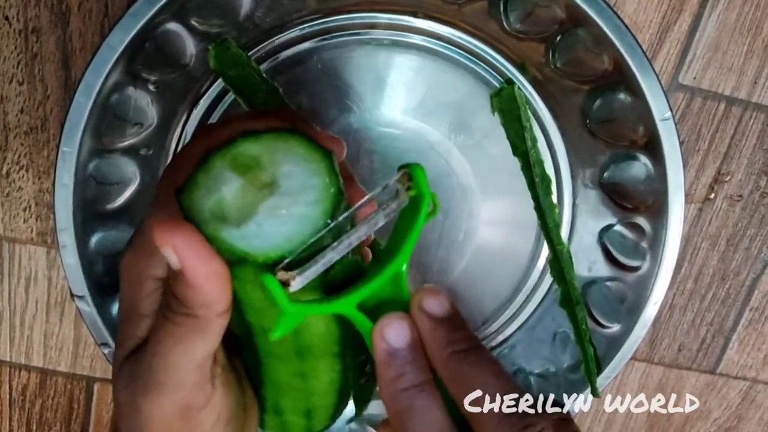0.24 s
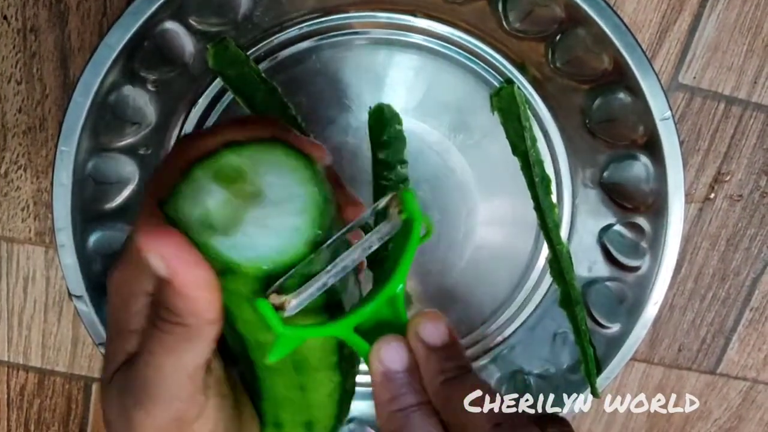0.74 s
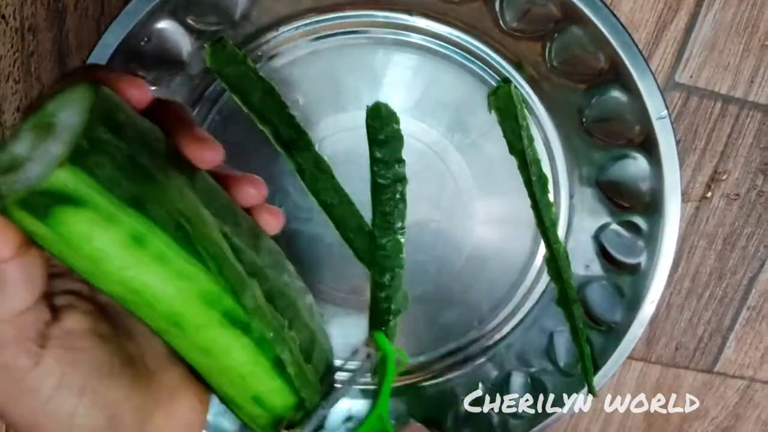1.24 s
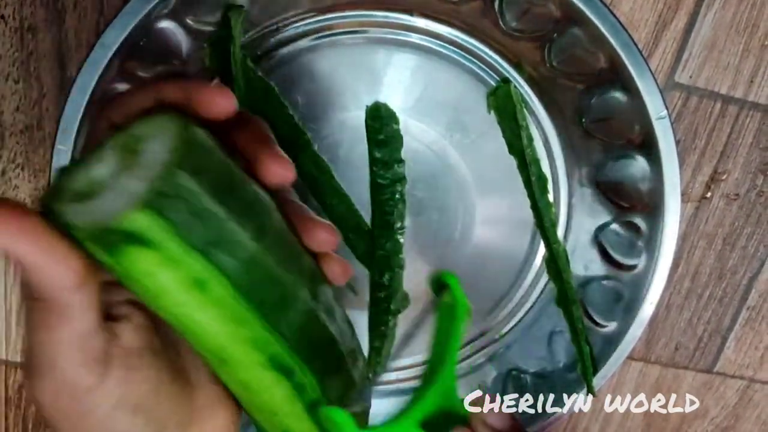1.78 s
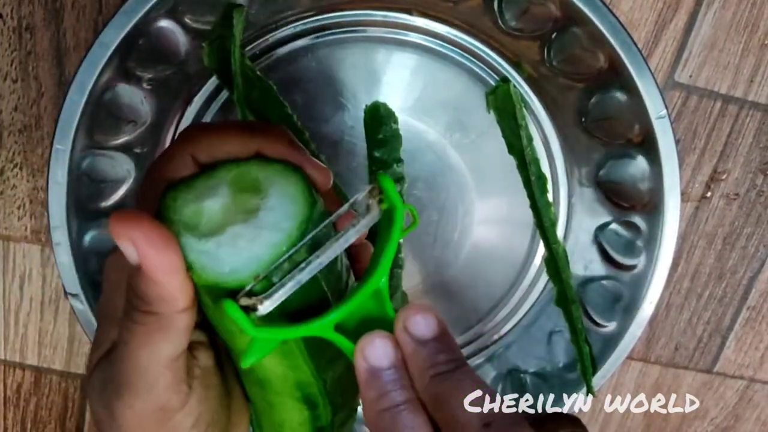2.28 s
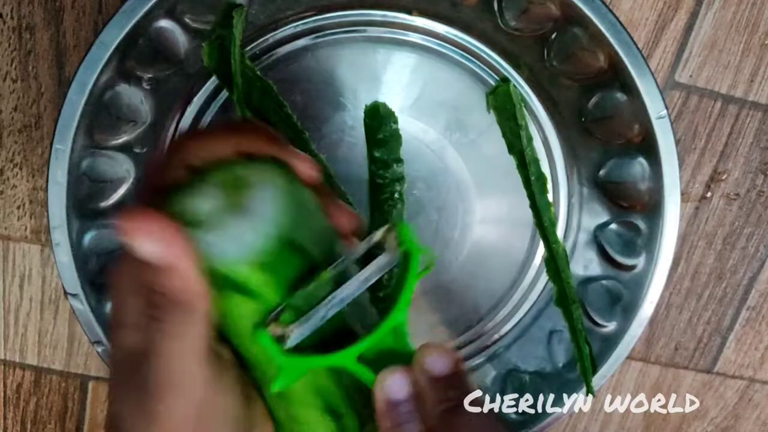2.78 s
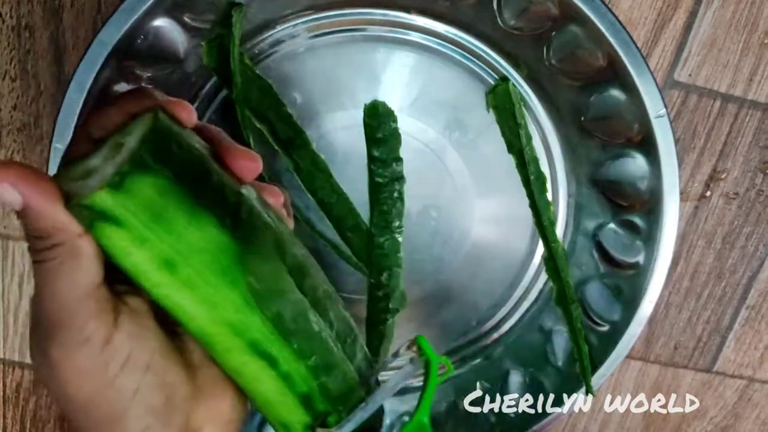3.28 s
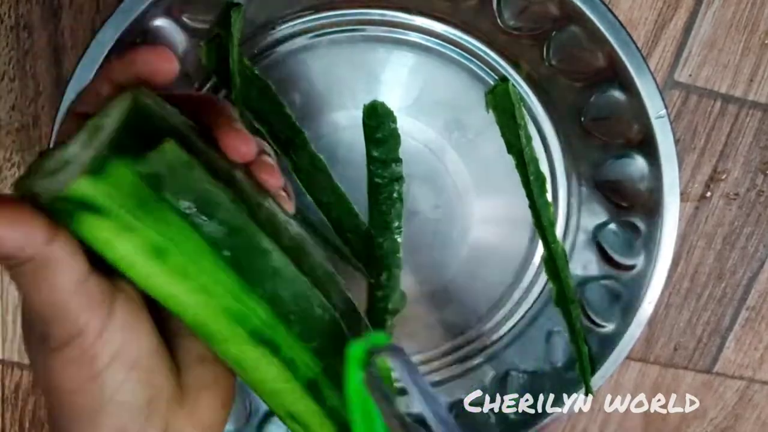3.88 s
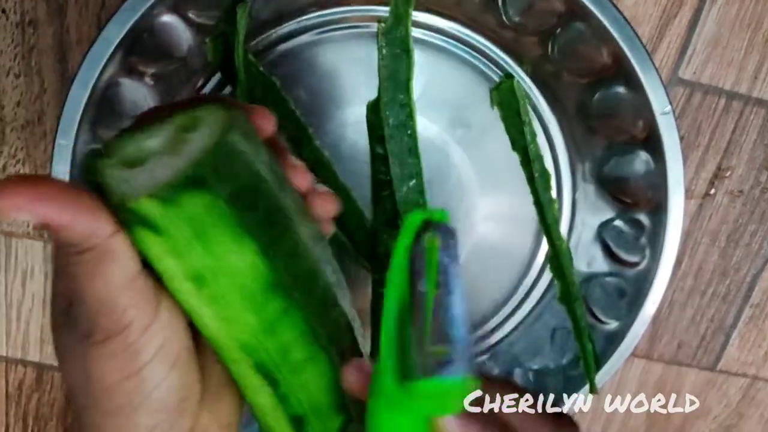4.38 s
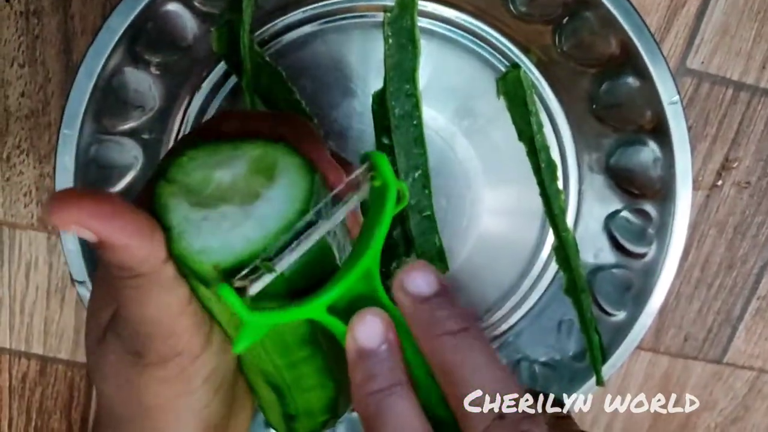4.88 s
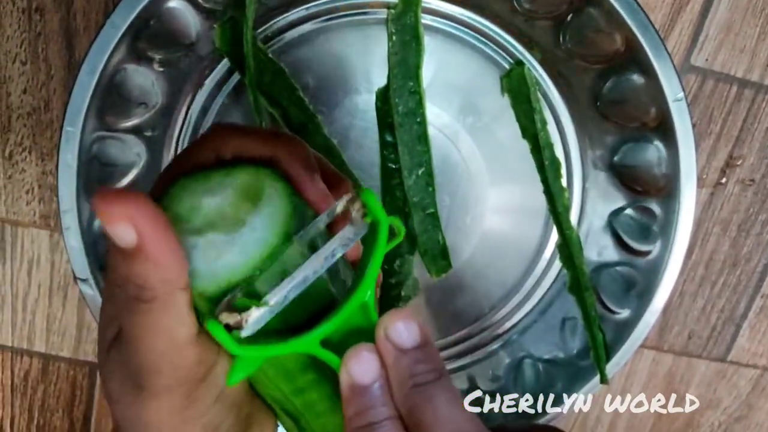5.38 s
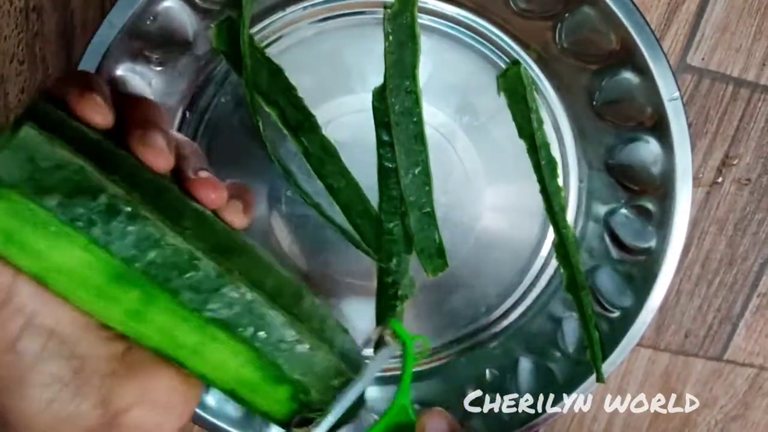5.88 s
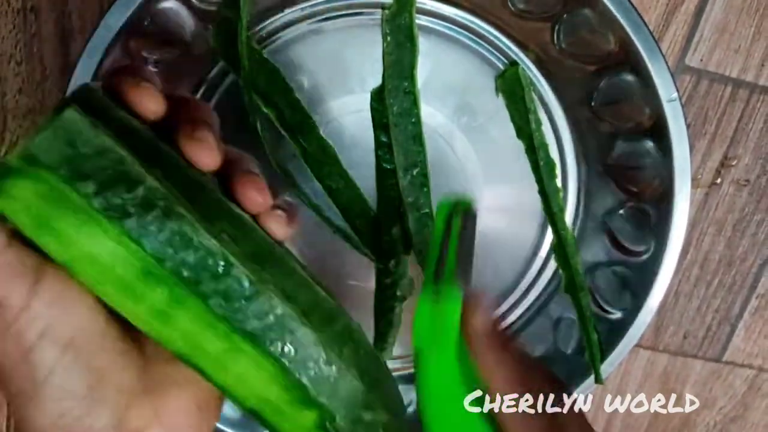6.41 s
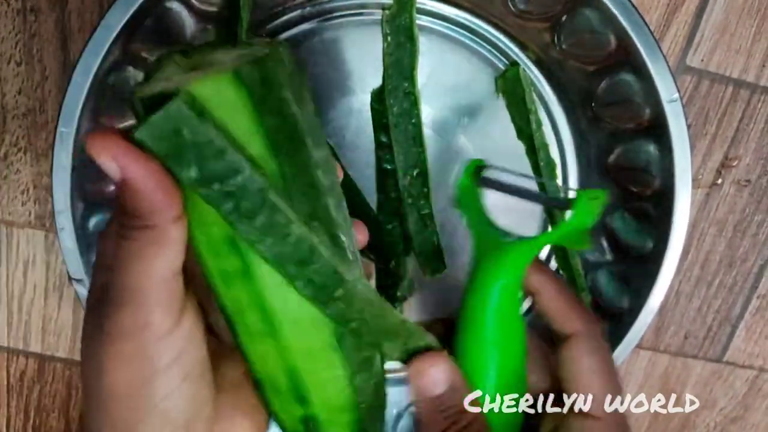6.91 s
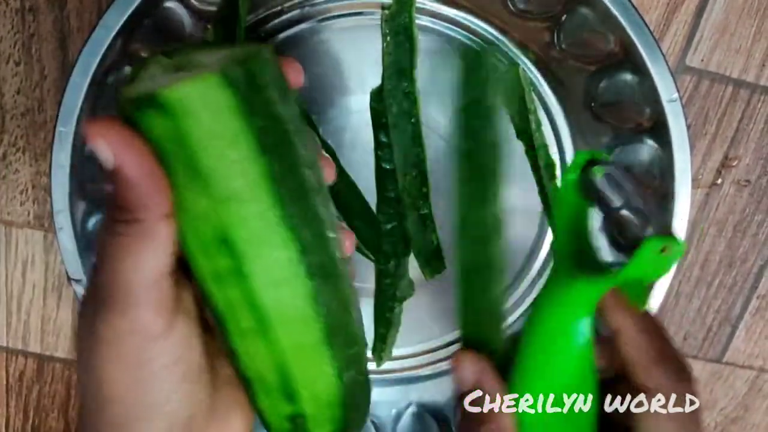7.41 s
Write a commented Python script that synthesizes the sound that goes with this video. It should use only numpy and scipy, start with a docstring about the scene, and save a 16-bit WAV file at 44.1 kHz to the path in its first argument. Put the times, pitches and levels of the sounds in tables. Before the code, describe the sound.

Close, wet, crunchy peeling strokes with snapping fibres and tiny squeaks, a hard clack near the start and another at the end, over soft room air.

```python
"""Peeling a cucumber in a small kitchen

A swivel peeler takes three strips off a cucumber over a steel plate, each in three short pulls.
Noise bursts for rupturing cells make the crunch; fibres snap as short noise, wet flesh squeaks as wavering tones.
Twice there is a sharp clack, and the loose blade ticks between pulls: noise cracks with decaying modes.
A small hard kitchen answers over a steady low rush of air and an early faint hum.
Two microphone ports listen from close above."""
import sys
import numpy as np
from scipy import signal
from scipy.fft import rfft, irfft, next_fast_len
from scipy.io import wavfile
from scipy.ndimage import uniform_filter1d, map_coordinates

SR = 44100
rng = np.random.default_rng(int(sys.argv[2]) if len(sys.argv) > 2 else 0)


def output_pcm(signal):
    """Save a mono or channel-first signal as 16-bit PCM at the path in sys.argv[1].

    Samples are clipped to [-1, 1] before scaling.
    """
    pcm = np.clip(np.atleast_2d(signal).T, -1, 1) * 32767
    wavfile.write(sys.argv[1], SR, np.round(pcm).astype(np.int16))


N = 337365

# spectrum of tearing skin: frequency_hz, density_db (relative, per Hz)
SKIN_SPECTRUM = [(500, -23), (900, -2), (1450, -5.5), (1850, -3.5), (2150, -1), (2800, -11.5), (3400, -11),
                 (4900, -17), (5700, -8), (6700, -1.5), (7400, 0), (8250, -4), (9200, -2.5), (10000, -18.5),
                 (11000, -26.5), (15500, -27)]
# modes of the peeler's frame, damped by the hand: frequency_hz, level_db, t60_s
FRAME_MODES = [(713, -10.5, 0.075), (1137, -4, 0.06), (1330, -14, 0.077), (1960, 12.5, 0.018),
               (2940, -14, 0.07), (3316, 0, 0.051), (3940, -3, 0.04), (4820, -7, 0.045), (5600, -10, .055),
               (6400, -10, 0.055), (6950, -8, 0.04), (7450, -7, 0.055), (8200, -9, .05), (9006, -6, 0.04)]


def amp(db):
    """Amplitude factor of a level in dB."""
    return 10 ** (np.asarray(db) / 20)


def unit(x):
    """x scaled to an rms of one."""
    return x / np.sqrt(np.mean(x ** 2) + 1e-20)


def along(points, hz):
    """Values between (Hz, value) points, on a log frequency axis."""
    f, v = np.transpose(points)
    return np.interp(np.log(hz + 1), np.log(f + 1), v)


def wobble(rate):
    """A smooth random curve through rate knots a second."""
    knots = rng.standard_normal(int(N * rate / SR) + 4)
    return map_coordinates(knots, [np.arange(N) * rate / SR])


def swells(rows):
    """Gain per sample from bells: centre s, time from centre to 1/e s, peak dB."""
    t = np.arange(N) / SR
    return sum(amp(db) * np.exp(-((t - s) / half) ** 2) for s, half, db in rows)


def filtered(x, response):
    """x times a response of frequency, padded so that tails do not wrap."""
    n = x.shape[-1]
    m = next_fast_len(n + SR // 4)
    return irfft(rfft(x, m) * response(np.fft.rfftfreq(m, 1 / SR)), m)[..., :n]


def coloured(x, points, size=2048):
    """x through a causal, minimum-phase filter with the given (Hz, dB) shape."""
    shape = amp(along(points, np.fft.rfftfreq(size, 1 / SR)))
    cepstrum = irfft(np.log(shape))
    # folding the cepstrum onto positive time puts the energy as early as it can be
    cepstrum[1:size // 2] *= 2
    cepstrum[size // 2 + 1:] = 0
    impulse = irfft(np.exp(rfft(cepstrum)))
    return signal.fftconvolve(x, impulse)[:len(x)]


def add(track, s, sound):
    """Mix a sound into the track at time s."""
    part = track[round(s * SR):][:len(sound)]
    part += sound[:len(part)]


def lagged(x):
    """Sound reaches the left port a little after the right, half the lag taken on each."""
    lag_s = 0.00017
    return filtered(x, lambda hz: np.exp(-1j * np.pi * np.outer([1, -1], hz) * lag_s))


def air():
    """A steady low rush in the room, most alike at the two ports in the bass."""
    # spectrum of the room air: frequency_hz, density_db (relative, per Hz)
    air_spectrum = [(15, -37), (25, -5), (37, -15), (82, -11.5), (140, -11.5), (156, -7), (178, -2),
                    (209, -4), (305, -2.5), (349, -11.5), (389, -1.5), (421, -4.5), (509, -1.5),
                    (567, -4.5), (741, -3), (919, -10), (1140, -8.5), (1410, -12), (2400, -17), (3930, -27),
                    (7500, -26.5), (9300, -29), (10600, -57), (15500, -57)]
    # room resonances that colour the air: frequency_hz, width_hz, boost_db
    resonances = [(177.1, 7.9, 6.5), (603, 43, 3), (1185, 120, 3.5)]
    # likeness of the two ports: frequency_hz, correlation (0 to 1)
    likeness = [(60, 0.39), (150, 1), (380, 0.78), (950, 0.48), (2380, 0.22), (5980, 0.047), (15000, 0.078)]
    # balance of the two ports: frequency_hz, left_minus_right_db
    balance = [(60, 6), (150, 4.5), (380, 5), (950, 2), (2380, 3), (5980, -0.5), (15000, 5)]
    level_db = -45.5  # of the mid signal, before the balance

    def mid_side_colour(hz):
        bumps = sum(db / (1 + (2 * (hz - centre) / width) ** 2) for centre, width, db in resonances)
        angle = np.arccos(np.clip(along(likeness, hz), -1, 1)) / 2
        side_share = np.tan(angle)
        return amp(along(air_spectrum, hz) + bumps) * np.array([np.ones_like(hz), side_share])

    mid, side = filtered(rng.standard_normal((2, N)), mid_side_colour)
    pair = np.array([mid + side, mid - side]) / np.std(mid)
    pair = filtered(pair, lambda hz: amp(np.outer([.5, -.5], along(balance, hz))))
    return pair * amp(level_db + 0.05 * wobble(2.3) + 0.2 * wobble(9.9))


def hum():
    """A faint low tone of unsteady level, the same at both ports, that stops early on."""
    pitch_hz, stop_s = 57.4, 2.3
    t = np.arange(N) / SR
    level = amp(-63 + 3.2 * wobble(4.1))
    stopping = np.clip((stop_s - t) * 20, 0, 1)
    return level * np.sin(2 * np.pi * pitch_hz * t) * stopping


def crack(t, t60):
    """A hard contact: a dying noise burst, evened over the spectrum and then coloured."""
    # spectrum of a hard contact: frequency_hz, density_db (relative, per Hz)
    contact_spectrum = [(50, -41), (200, -3.5), (450, -20), (880, -14.5), (1150, 3), (1600, -6), (2000, 1),
                        (2650, -3), (4500, -2.5), (6200, -3), (7600, 3), (9200, 4), (10300, -14.5),
                        (12500, -21), (15500, -24)]
    fade = amp(-60 * t / t60)
    phases = np.angle(rfft(rng.standard_normal(len(t)) * fade))
    even = irfft(np.exp(1j * phases), len(t))
    burst = coloured(even * np.sqrt(fade), contact_spectrum)
    return burst * np.linalg.norm(fade) / np.linalg.norm(burst)


def ring(t, modes, scatter_db):
    """A struck part's modes as decaying sines, their strengths scattered anew for each blow."""
    rise_s = 0.0003  # the modes take an instant to build up
    hz, db, t60 = np.transpose(modes)[:, :, None]
    gain = amp(db + scatter_db * rng.standard_normal(hz.shape) - 60 * t / t60)
    return np.sum(gain * np.sin(2 * np.pi * hz * t), 0) * (1 - np.exp(-t / rise_s))


def chirp(t, hz, swell):
    """The thin blade buzzes for an instant in its pivot: a tone that peaks after swell seconds."""
    envelope = t / swell * np.exp(1 - t / swell)
    return envelope * np.sin(2 * np.pi * hz * t)


def ticks():
    """Light contacts: bright when the blade alone moves, fuller and ringing when the frame is knocked."""
    # light ticks of the loose blade: start_s, level_db (before trim), body_db, ring_db, sharpness_db
    tick_rows = [(0.4265, -42.5, 27, -26, -4), (1.569, -38, 10, -15, -5), (1.621, -47, 23, -28, -8),
                 (1.647, -43, 26, -28, -15), (1.873, -38.5, -22, -22, -8), (2.241, -41, 13, -19, -17),
                 (4.2768, -35, 5, -30, -20), (4.2789, -29.5, 7, -29, -17), (7.547, -39, 23, -28, -10)]
    trim_db = -3.5
    out, t = np.zeros(N), np.arange(SR // 4) / SR
    for s, db, body_db, ring_db, sharp_db in tick_rows:
        hit = crack(t, t60=0.024) + amp(ring_db) * ring(t, FRAME_MODES, scatter_db=4)
        tone = [(600, 2), (1200, body_db), (2200, body_db / 4), (7500, 0.81), (11000, sharp_db)]
        add(out, s, amp(db + trim_db) * coloured(hit, tone))
    return out


def clacks():
    """Each contact cracks, rings the frame and the blade, and buzzes the pivot."""
    # contacts within the two sharp clacks: start_s, level_db (before trim), frame_ring_db, blade_ring_db,
    # blade_chirp_db (before trim), crack_t60_s
    contacts = [(0.506, -28, -20, -8, 16, .008), (0.508, -12, -22, -26, -4, 0.022),
                (0.509, -9.5, -12, -26, -9, 0.023), (0.5123, -11.5, -21.5, -25, -2, 0.019),
                (0.5204, -18.5, -21, -23, -8, 0.022), (7.583, -12, -24.5, -20, -4, 0.0086),
                (7.5833, -9.5, -28, -12.5, 11.5, 0.0092)]
    # modes of the blade when it swings free against its stop: frequency_hz, level_db, t60_s
    blade_modes = [(1113, -5, 0.023), (1270, -2, 0.036), (2240, -4.5, .02), (2495, 2.5, 0.021),
                   (3080, -14, 0.024), (3700, -8, 0.042), (4540, -4, .035), (7390, -4, 0.048)]
    trim_db, chirp_trim_db = -3.5, -4.0
    out, t = np.zeros(N), np.arange(SR // 3) / SR
    for s, db, frame_db, blade_db, chirp_db, crack_t60 in contacts:
        frame = amp(frame_db) * ring(t, FRAME_MODES, scatter_db=3)
        blade = amp(blade_db) * ring(t, blade_modes, scatter_db=0)
        buzz = amp(chirp_db + chirp_trim_db) * chirp(t, hz=7860, swell=0.00029)
        add(out, s, amp(db + trim_db) * (crack(t, crack_t60) + frame + blade + buzz))
    # the clacks carry little below 110 Hz
    return signal.sosfilt(signal.butter(2, 110, "highpass", fs=SR, output="sos"), out)


def crunch(rate, spread_db, hiss):
    """Tiny ruptures of uneven size, rate a second, over a smooth hiss of friction."""
    happens = rng.random(N) < rate / SR
    bursts = happens * rng.standard_normal(N) * amp(spread_db * rng.standard_normal(N))
    return unit(unit(bursts) + hiss * rng.standard_normal(N))


def patchy(x, size=256):
    """x with each region of pitch swelling and sinking by itself, as the cut moves from spot to spot."""
    patch_hz, patch_s, depth_db = 800, .016, 3
    hz, t, z = signal.stft(x, SR, nperseg=size)
    knots = rng.standard_normal((64, 2048))
    places = np.meshgrid(hz / patch_hz, t / patch_s, indexing="ij")
    field = map_coordinates(knots, places, mode="wrap")
    return signal.istft(z * amp(depth_db * field), SR, nperseg=size)[1][:len(x)]


def pull(t, length, bite, change_db):
    """Gain of one pull: it bites in, holds while the hand presses, then lets go into a light drag."""
    release_db_per_s = 332  # the cut dies away as the hand slows
    drag_db, drag_s = -24.5, 0.23  # level under the end of the pull, time to fade to 1/e
    attack = np.clip(t / bite, 0, 1)
    hold = amp(change_db * (np.clip(t / length, 0, 1) - .5))
    after = np.maximum(t - length, 0)
    drag = amp(drag_db) * np.exp(-(after / drag_s) ** 2)
    release = np.maximum(amp(-release_db_per_s * after), drag)
    return attack * hold * release


def angled(x, body_db, edge_db):
    """The angle of the blade sets how full and how bright the cut is."""
    return coloured(x, [(2800, body_db), (5500, 0), (7700, 0), (9200, edge_db), (11500, 0)])


def peeling():
    """Cells burst under the edge; the bumpy skin makes the cut swell, catch and change colour."""
    # pulls of the blade, three to a strip: start_s, length_s, bite_s (time to bite in),
    # level_db (mid-pull, before trim), change_db (over the pull), body_db, edge_db (brightness)
    pull_rows = [(0.753, 0.19, 0.045, -45.5, -4.5, 2, -2), (1.05, 0.16, 0.043, -46, -2.5, 0, 0),
                 (1.35, 0.052, 0.016, -49.5, 10, 1.5, -1), (2.747, 0.14, 0.022, -43.5, -3, -0.5, -0.5),
                 (3.01, 0.15, 0.051, -42, -1.5, -3, -1.5), (3.352, 0.068, 0.025, -44, 0, 2.5, 4.5),
                 (5.398, 0.14, 0.026, -44, -1, -0.5, 1), (5.614, 0.19, 0.12, -40, -1, -1, -2.5),
                 (5.98, 0.07, 0.014, -54, 2, 3, 1)]
    trim_db = -1.2
    ridges = 1.4 * wobble(70)  # dB; bumps of the skin that make the cut flutter
    catches = 0.5 * wobble(400)  # dB; quick catches of the edge
    bursting = crunch(rate=1000, spread_db=3.5, hiss=0.86) * amp(ridges + catches)
    cells = unit(patchy(coloured(bursting, SKIN_SPECTRUM)))
    cut, t = np.zeros(N), np.arange(SR) / SR
    for s, length, bite, db, change_db, body_db, edge_db in pull_rows:
        stroke = cells[round(s * SR):][:len(t)] * pull(t, length, bite, change_db)
        add(cut, s, amp(db + trim_db) * angled(stroke, body_db, edge_db))
    return cut


def snags():
    """A tough fibre snags the edge, then snaps: a sudden short burst of noise."""
    # snapping fibres: start_s, level_db, edge_db (brightness)
    snag_rows = [(1.374, -49, 0), (1.414, -34.5, -2), (2.887, -38, -2), (3.126, -38, 2), (3.381, -33, 3),
                 (3.438, -32, 11), (3.449, -36, 9), (5.508, -42, 2), (5.812, -37, -8), (6.040, -32, 5.5),
                 (6.069, -33.5, 6)]
    rise_s, t60_s = 0.0012, 0.03
    out, t = np.zeros(N), np.arange(SR // 8) / SR
    for s, db, edge_db in snag_rows:
        noise = unit(coloured(rng.standard_normal(len(t)), SKIN_SPECTRUM))
        burst = noise * (1 - np.exp(-t / rise_s)) * amp(-60 * t / t60_s)
        add(out, s, amp(db) * angled(burst, body_db=0, edge_db=edge_db))
    return out


def squeaks():
    """The blade sticks and slips on wet flesh as a strip ends: a brief wavering note."""
    # squeaks: centre_s, half_length_s (to 1/e), pitch_hz (before the waver), level_db (peak)
    squeak_rows = [(1.398, 0.0082, 970, -43), (3.425, .014, 965, -45.5), (3.46, .007, 880, -48),
                   (6.075, .008, 900, -46)]
    waver = 0.046  # share of its pitch by which a squeak wavers
    drift = np.cumsum(1 + waver * wobble(300)) / SR
    return sum(swells([(s, half, db)]) * np.sin(2 * np.pi * hz * drift) for s, half, hz, db in squeak_rows)


def tearing():
    """The end of each strip tears loose: its last shred parts with a lower, hollow rasp."""
    # tears: centre_s, half_length_s (to 1/e), level_db (before trim)
    tear_rows = [(1.415, 0.012, -51), (3.41, 0.032, -51), (3.453, 0.0067, -49), (6.062, 0.015, -47)]
    # hollow rasp of the last shred: frequency_hz, density_db (relative, per Hz)
    shred_spectrum = [(600, -17), (980, -5), (1400, -2), (2000, -9), (2600, 3), (3500, -9.5), (6000, -20)]
    trim_db = -1.2
    rasp = unit(coloured(crunch(rate=680, spread_db=6.5, hiss=0.21), shred_spectrum))
    return amp(trim_db) * swells(tear_rows) * rasp


def handling():
    """Wet peel and fingers rub faintly: dense tiny ruptures under soft swells."""
    # soft rubs of peel and fingers: centre_s, half_length_s (to 1/e), level_db (before trim)
    rub_rows = [(4.12, 0.018, -57.5), (6.7, 0.2, -70), (6.885, 0.041, -63), (7.352, 0.013, -62)]
    trim_db = -0.5
    rub = crunch(rate=3000, spread_db=3, hiss=0.74)
    tone = [(1500, -10), (5000, -14), (7500, 9.0), (9200, 5), (10500, -11), (15000, -13)]
    return amp(trim_db) * swells(rub_rows) * unit(coloured(rub, tone))


def evened(echoes, size=45):
    """Reflections with their broad peaks and dips levelled: they smear a sound but hardly colour it."""
    power = uniform_filter1d(np.abs(rfft(echoes)) ** 2, size)
    hz = np.fft.rfftfreq(len(echoes), 1 / SR)
    return coloured(echoes, np.column_stack([hz, -10 * np.log10(power / power.mean())]))


def kitchen(x, near_db, near_t60, room_db):
    """Direct sound, quick reflections off the plate and floor, then the room's tail."""
    # how long the kitchen rings: frequency_hz, t60_s
    room_decay = [(200, 0.65), (1800, 0.34), (4000, 0.46), (8000, 0.4), (15000, 0.25)]
    hz, t, z = signal.stft(rng.standard_normal((2, SR // 2)), SR, nperseg=256)
    fade = amp(-60 * t / along(room_decay, hz)[:, None])
    tail = signal.istft(z * fade, SR, nperseg=256)[1]
    t = np.arange(tail.shape[1]) / SR
    tail = tail * (1 - np.exp(-t / 0.002))  # the tail builds up over a few ms
    near = rng.standard_normal(tail.shape) * amp(-60 * t / near_t60) * (t > .001)
    echoes = amp(near_db) * near / np.linalg.norm(near[0])
    echoes += amp(room_db) * tail / np.linalg.norm(tail[0])
    echoes[:, 0] += 1  # the direct sound
    responses = np.array([evened(port) for port in echoes])
    return signal.fftconvolve(lagged(x), responses, axes=1)[:, :N]


def scene():
    """Everything the hands do sounds in the kitchen and reaches each port with its own colour."""
    # colour of each microphone port: frequency_hz, gain_db
    left_colour = [(1000, -0.5), (2100, 1), (3000, 4), (6000, -0.5), (7600, -3.5), (9100, 3.5), (11000, -4),
                   (14000, 4)]
    right_colour = [(1000, -0.5), (2100, -1), (3000, 4), (6500, 0), (7600, 8), (8400, -2), (9200, -9.5),
                    (10500, 1.5), (14000, 2.5)]
    background = lagged(air()) + hum()
    knocks = kitchen(ticks() + clacks(), near_db=2.2, near_t60=0.088, room_db=-7)
    work = peeling() + snags() + squeaks() + tearing() + handling()
    cutting = kitchen(work, near_db=3.5, near_t60=0.077, room_db=-8.0)
    left, right = cutting + knocks
    return np.array([coloured(left, left_colour), coloured(right, right_colour)]) + background


def record(dry):
    """The recorder rounds off the tallest peaks and cuts steeply above its band limit."""
    ceiling, top_hz = .92, 15800
    rounded = dry / (1 + np.abs(dry / ceiling) ** 6) ** (1 / 6)
    return filtered(rounded, lambda hz: 1 / (1 + (hz / top_hz) ** 120))


dry = scene()
out = record(dry)
output_pcm(out)
```